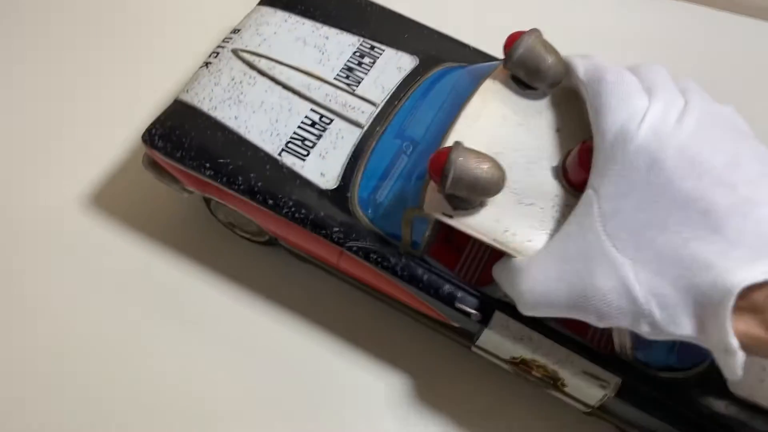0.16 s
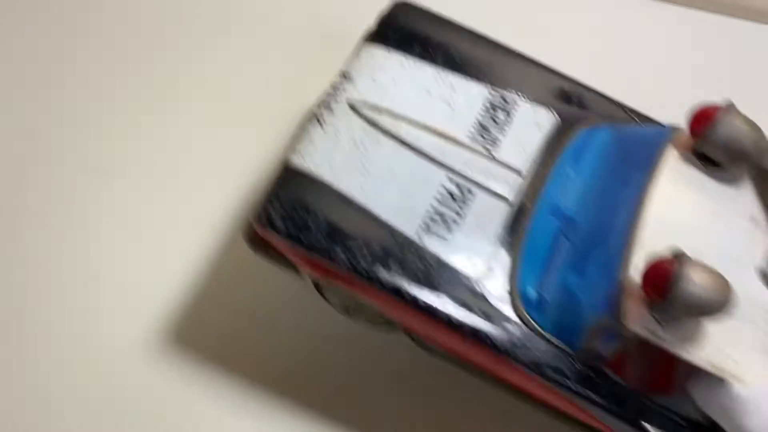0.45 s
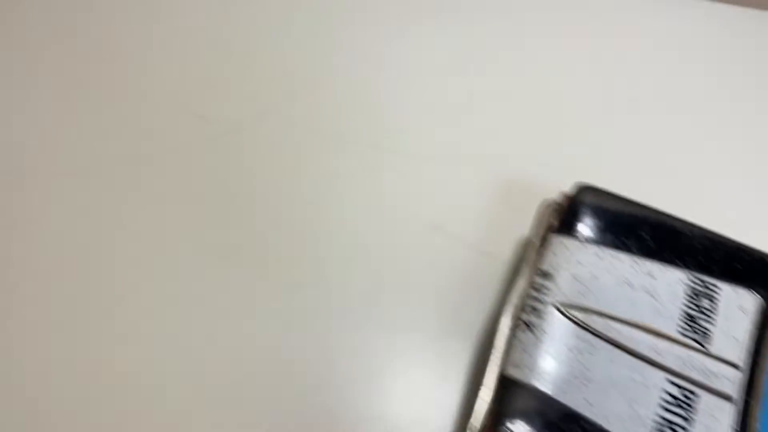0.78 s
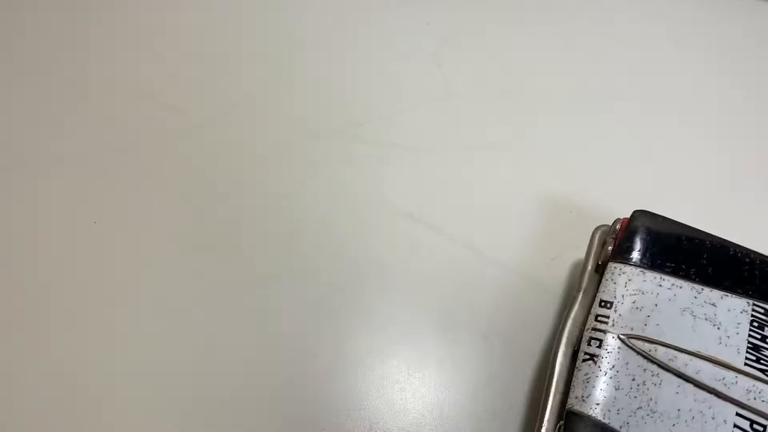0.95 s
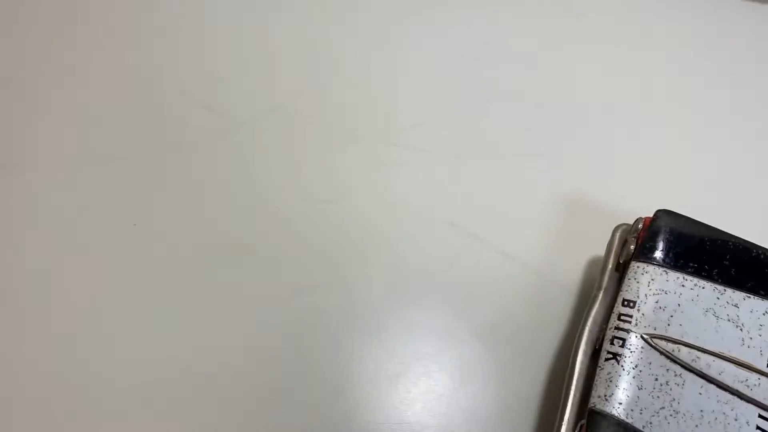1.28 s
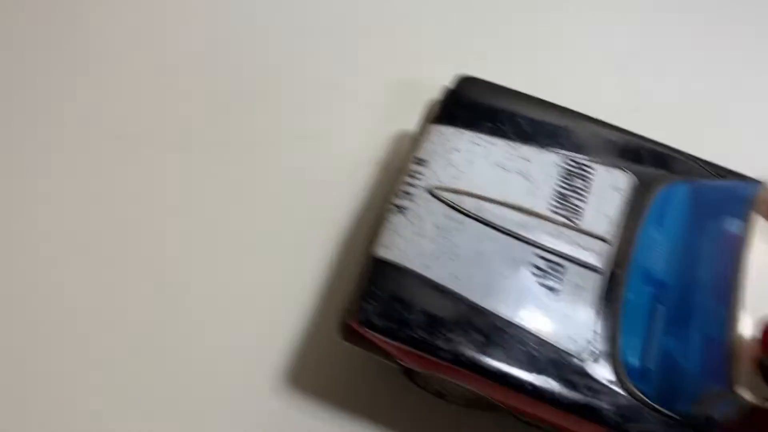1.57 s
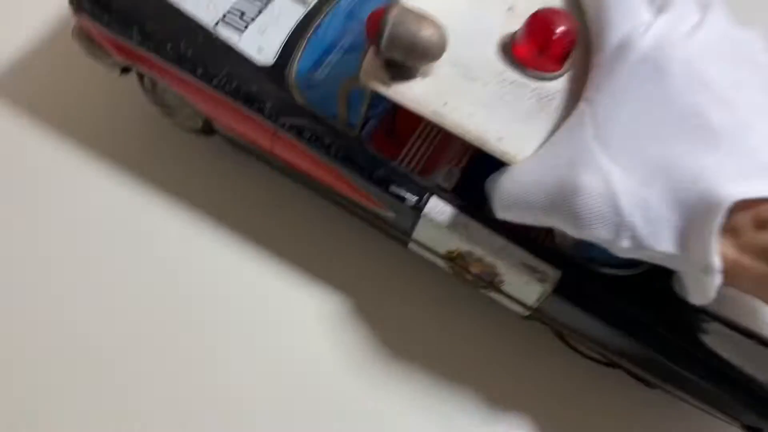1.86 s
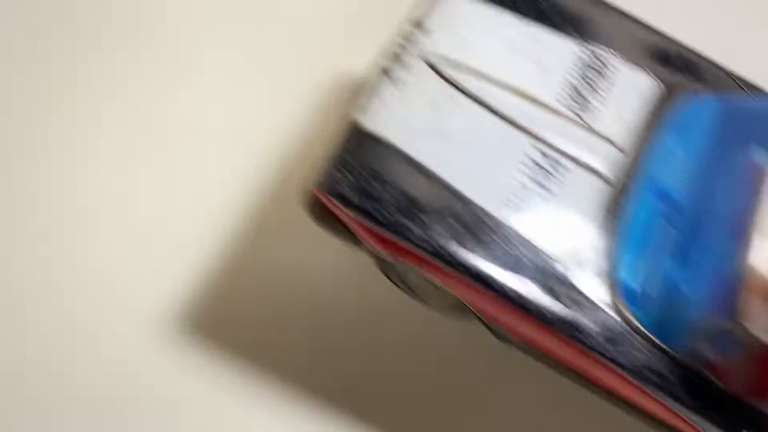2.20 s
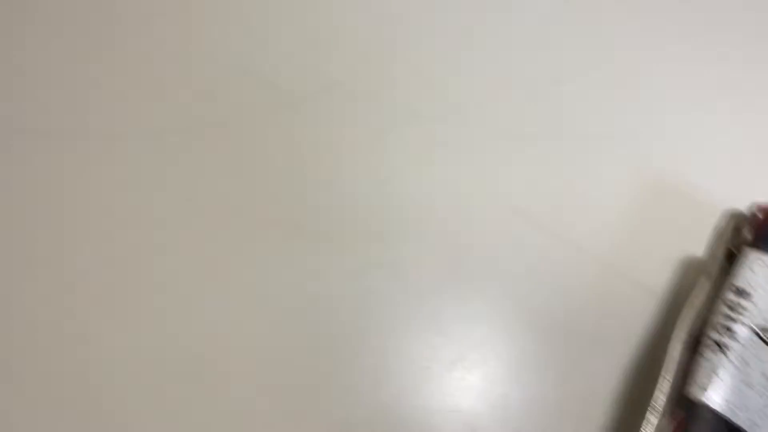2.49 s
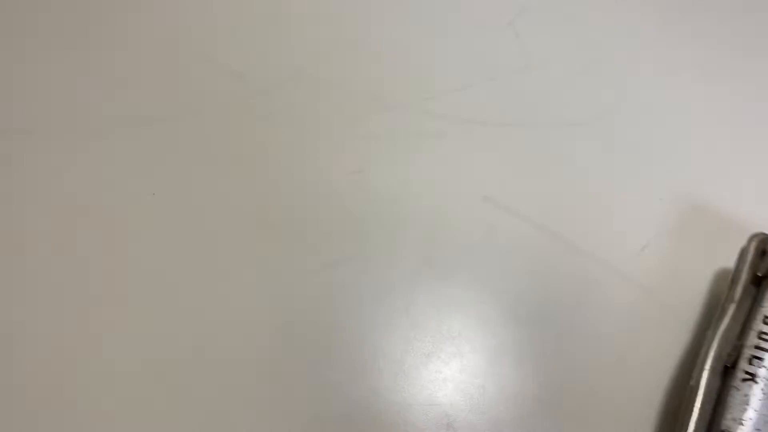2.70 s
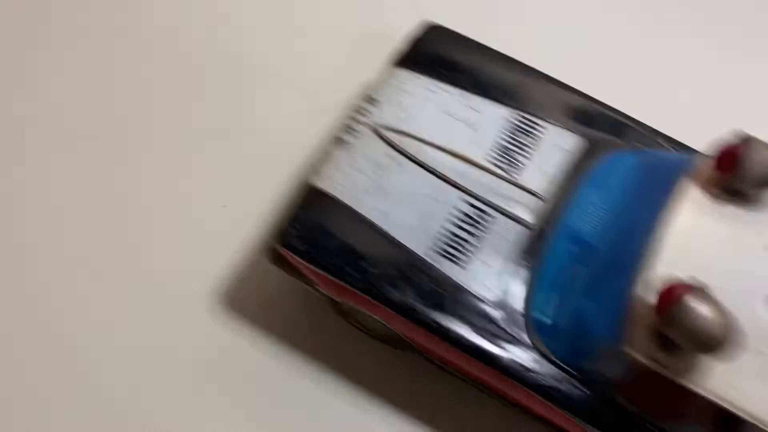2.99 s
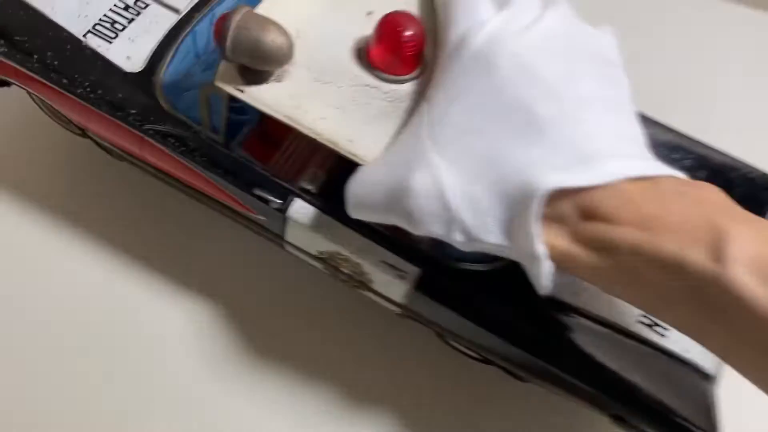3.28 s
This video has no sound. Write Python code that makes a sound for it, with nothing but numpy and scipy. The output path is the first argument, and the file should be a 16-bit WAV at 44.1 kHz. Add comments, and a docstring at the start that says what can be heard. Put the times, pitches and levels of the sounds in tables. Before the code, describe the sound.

A friction-drive tin toy car coasts with a faint sinking whine, thumps onto a table, then is pushed twice with rough grinding whirrs and rattling between, heard very close in stereo.

```python
"""Tyres rumble, gears rattle and whine, and tin knocks as a toy car is pushed, lifted and set down, twice.
Wheels, gear teeth and knocks are dense random impacts, filtered by the resonances of a tin shell.
A flywheel coasting in the air is a set of sinking gear tones; a hard push adds a rough grind.
Knocks and short gear rattles sum a thump, clank, jangle and click with panel tones; snaps are noise bursts.
Two close microphone ports of a camera hear it, with a likeness and balance that vary with frequency."""
import sys
import numpy as np
from scipy import signal
from scipy.fft import rfft, irfft, next_fast_len
from scipy.io import wavfile
from scipy.ndimage import map_coordinates

SR = 44100
rng = np.random.default_rng(int(sys.argv[2]) if len(sys.argv) > 2 else 0)


def master(y):
    """Save y as 16-bit WAV."""
    cut = np.clip(np.atleast_2d(y).T, -1, 1)
    pcm = np.round(cut * 32767)  # scale
    wavfile.write(sys.argv[1], SR, pcm.astype(np.int16))


N = 152145

# level of the wheels on the table: time_s, level_db
WHEEL_LEVELS = [(0, -34.5), (.12, -41.5), (.22, -39.5), (.36, -58), (.77, -55), (.84, -54), (.89, -29.5),
                (.94, -34), (1.04, -35), (1.13, -46), (1.19, -37), (1.35, -37.5), (1.42, -34.5),
                (1.47, -28), (1.55, -25.5), (1.65, -21.5), (1.82, -26.5), (1.89, -41.5), (2.0, -52.5),
                (2.54, -77), (2.59, -23.5), (2.69, -28.5), (2.79, -32.5), (2.85, -28), (2.92, -23.5),
                (3.11, -20), (3.205, -26), (3.25, -45), (3.45, -53)]

BUMPS_PER_S, TEETH_PER_S = 1500, 5000  # mean impact rates
TOOTH_SCATTER_DB = 2


def amp(db):
    """Decibel law: 20 dB is a factor of ten in amplitude."""
    return 10 ** (np.asarray(db) / 20)


def unit(x):
    """Power normalisation: scale to a root mean square of 1."""
    return x / np.sqrt(np.mean(x ** 2) + 1e-20)


def along(points, hz):
    """Interpolation of (frequency, value) points on a logarithmic frequency axis."""
    f, v = np.transpose(points)
    return np.interp(np.log(hz + 1), np.log(f + 1), v)


def curves(rows):
    """Linear interpolation in time: one value per sample for each column after the time."""
    s, *cols = np.transpose(rows)
    return [np.interp(np.arange(N) / SR, s, c) for c in cols]


def wobble(rate):
    """Slow random modulation: a smooth curve through normal random knots, rate of them a second."""
    knots = rng.standard_normal(int(N * rate / SR) + 4)
    return map_coordinates(knots, [np.arange(N) * rate / SR])


def filtered(x, response):
    """Linear filtering: the spectrum of x times a complex response of frequency."""
    m = 2 * next_fast_len(N // 2 + SR // 4)
    hz = np.fft.rfftfreq(m, 1 / SR)
    return irfft(rfft(x, m) * response(hz), m)[..., :N]


def shell(x, colour):
    """Resonant body: a minimum-phase filter of unit power, a broad colour with the shell's modes on it."""
    # modes of the tin shell on the table: centre_hz, width_hz, lift_db
    modes = [(59.5, 4, 6), (105.2, 14.7, 9), (173, 9.6, 4), (229.6, 14, 5), (313, 53, 7), (381, 27, 6),
             (416, 42, 8.5), (503.5, 57, 9.5), (648, 193, 10), (814, 136, 4.5), (901, 120, 4),
             (1070, 39, 6.5), (1257, 153, 5.5), (1603, 440, 4), (2016, 56, 3), (2520, 89, 4),
             (4220, 690, 3), (5740, 300, 1.5), (7140, 390, 2.5), (7500, 530, 1.5), (11100, 370, 5.5)]

    def response(hz):
        lift_db = sum(db / (1 + (2 * (hz - c) / w) ** 2) for c, w, db in modes)
        gain = unit(amp(along(colour, hz) + lift_db))
        # folding the cepstrum onto positive times makes the filter causal
        cepstrum = irfft(np.log(gain + 1e-6))
        half = len(cepstrum) // 2
        return np.exp(rfft(np.r_[cepstrum[0], 2 * cepstrum[1:half]], len(cepstrum)))
    return filtered(x, response)


def impacts(rate, scatter_db):
    """Shot noise: dense irregular taps that ring the sheet metal, in two unrelated rows of rms 1."""
    ring_t60_s, ring_db, drift_rad = 0.042, 2.5, 1.46
    struck = rng.random((2, N)) < rate / SR
    signs = rng.choice([-1, 1], (2, N))
    strengths = amp(scatter_db * np.clip(rng.standard_normal((2, N)), -2, 2))
    taps = struck * signs * strengths

    def treble(hz):
        return hz / (hz + 700)

    t = np.arange(SR // 10) / SR
    tails = rng.standard_normal((2, 2, len(t))) * amp(-60 * t / ring_t60_s)
    rung = signal.fftconvolve(taps[None], tails, axes=2)[..., :N]
    ring_a, ring_b = filtered(unit(rung), treble)
    # the blend of two rings drifts as the car moves
    blend = drift_rad * wobble(5.005)
    ring = amp(ring_db) * (np.cos(blend) * ring_a + np.sin(blend) * ring_b)
    # offset the ring's added treble, so that the spectrum stays level
    return unit(filtered(unit(taps) + ring, lambda hz: 1 / np.hypot(1, amp(ring_db) * treble(hz))))


def wheels():
    """Rolling noise: tyres bump over the table and shake the shell while the car is pressed down."""
    # spectrum of the rumble: freq_hz, relative_db_per_hz
    rumble_colour = [(20, -38), (45, 3.5), (130, 0), (300, -2.5), (500, -4.5), (900, -4), (1500, -7.5),
                     (1950, -9.5), (2700, -21), (5000, -26), (16000, -34.5)]
    scatter_db, flutter_db = 1.5, 1.05
    level_db, = curves(WHEEL_LEVELS)
    bumps = impacts(BUMPS_PER_S, scatter_db)
    return shell(bumps * amp(level_db + flutter_db * wobble(70)), rumble_colour)


def gears():
    """Gear rattle: loose teeth strike in a dense stream, with buzz, rattle and treble levels of their own."""
    # gear train: time_s, buzz_level_db, rattle_level_db, fizz_level_db
    gear_levels = [(0, -43.5, -46, -42.5), (.2, -42.5, -43, -44.5), (.42, -44, -51, -49),
                   (.6, -40.5, -48, -51), (.78, -35.5, -48, -46), (.92, -37.5, -51.5, -47),
                   (1.03, -47.5, -60, -65), (1.13, -53, -60, -58), (1.35, -62, -64, -59),
                   (1.5, -55, -44, -47), (1.66, -26.5, -34, -32), (1.82, -22, -29, -27),
                   (1.93, -33.5, -28.5, -29), (2.08, -32.5, -31.5, -27.5), (2.3, -34.5, -36.5, -31),
                   (2.45, -31, -39, -29.5), (2.55, -32.5, -39, -31), (2.68, -37.5, -32, -37),
                   (2.84, -30, -35, -34), (3.0, -29, -29.5, -30), (3.13, -19.5, -26.5, -27.5),
                   (3.24, -26, -30, -28.5), (3.32, -30.5, -23, -25), (3.45, -33.5, -30, -23.5)]
    # buzz of the shell: freq_hz, relative_db_per_hz
    buzz_colour = [(30, -19), (130, -17), (235, -27.5), (370, -6.5), (550, -8.5), (720, -6), (1050, -2.5),
                   (1200, -8), (1400, -6.5), (1680, -2.5), (2200, -5), (3500, -12), (8000, -27.5)]
    # rattle of the teeth: freq_hz, relative_db_per_hz
    rattle_colour = [(300, -38), (1500, 1.5), (2100, 0.5), (3000, -2), (4500, 3.5), (6300, 3.5),
                     (7400, 2.5), (8200, 5), (9500, 1.5), (12000, -6), (16000, -44)]
    # top treble: freq_hz, relative_db_per_hz
    fizz_colour = [(2000, -55), (7000, -63), (9500, 7.5), (11000, -3), (13000, 2.5), (14200, 2.5),
                   (15500, 2.5)]
    flutter_db = 0.78 * wobble(200)  # shared by the three layers
    drifts_db = (1.3, .7, .6)
    colours = (buzz_colour, rattle_colour, fizz_colour)
    out = np.zeros((2, N))
    for level_db, drift_db, colour in zip(curves(gear_levels), drifts_db, colours):
        strikes = impacts(TEETH_PER_S, TOOTH_SCATTER_DB)
        out += shell(strikes * amp(level_db + flutter_db + drift_db * wobble(27.73)), colour)
    return out


def grind():
    """Stick-slip: loaded gears catch and slip under a push, in a grind that grows faster than the rumble."""
    # spectrum of the grind: freq_hz, relative_db_per_hz
    grind_colour = [(600, -20.5), (1100, -1.5), (1400, 0.5), (1700, 5), (2300, -4), (3200, -6.5),
                    (5000, -21), (12000, -32)]
    full_push_grind_db, full_push_wheels_db = -30, -21
    growth = 1.1  # dB of grind per dB of wheel level
    catches_per_s, catch_depth_db = 320, 6
    level_db, = curves(WHEEL_LEVELS)
    strikes = impacts(BUMPS_PER_S, TOOTH_SCATTER_DB)
    teeth = unit(strikes * amp(catch_depth_db * wobble(catches_per_s)))
    grind_db = full_push_grind_db + growth * (level_db - full_push_wheels_db)
    return shell(teeth * amp(grind_db), grind_colour)


def whine():
    """Gear meshing: tones sink as the flywheel slows, and swell on passing a panel's resonance."""
    # coasts in the air: start_s, end_s, mesh_pitch_hz, sag_hz_per_s, level_db, fade_db_per_s, hard_push (0 or 1)
    coasts = [(0.0, .76, 1473, 138, -48.5, 4, 0), (1.85, 2.57, 1360, 122, -39, 4, 1),
              (3.22, 3.5, 1415, 122, -40, 4, 1)]
    # gear tones: multiple_of_mesh_pitch, waver_share, gentle_coast_db, hard_coast_db
    tones = [(.498, 0.005, -20, -3), (1, 0.0028, 2.5, 0.5), (.985, .008, 0, -18), (3.14, 0.015, -3, -3.5),
             (3.93, .006, -20, -3), (4.16, 0.009, -14, 3), (4.43, .005, -20, -1.5), (4.84, .022, -4, -8),
             (5.17, 0.006, -12, 1.5), (5.65, 0.011, -15, 0)]
    panel_hz, panel_width_hz, panel_lift_db = 642, 13, 13  # the lowest tone can sink through it
    treble_fade_db_per_s, flutter_db = 17, 3
    t = np.arange(N) / SR
    out = np.zeros((2, N))
    for start, end, hz, sag, db, fade, hard in coasts:
        age = np.clip(t - start, 0, end - start)
        ramps = np.clip(np.minimum(t - start, end - t) / 0.045, 0, 1)
        level = amp(db - fade * age) * ramps
        pitch = hz - sag * age
        for multiple, waver, *tone_db in tones:
            tone_hz = multiple * pitch
            phase = 2 * np.pi * np.cumsum(tone_hz * (1 + waver * wobble(300))) / SR
            hum_db = panel_lift_db / (1 + (2 * (tone_hz - panel_hz) / panel_width_hz) ** 2)
            # after a hard push the high tones fade early
            loss_db = treble_fade_db_per_s * age * hard * (multiple > 2)
            gain = amp(tone_db[hard] + hum_db - loss_db + flutter_db * wobble(110))
            out += level * gain * np.array([np.sin(phase), np.cos(phase)])
    return out


def knocks():
    """Impact excitation: table contacts thump, short gear rattles in the air barely do; all die away."""
    # knocks and brief gear-train rattle swells: start_s, thump_db, clank_db, jangle_db, click_db, length_s
    knock_events = [(0.16, -42, -30, -28, -39, 0.0088), (0.186, -60, -36, -36, -42, .006),
                    (0.796, -17.5, -19.5, -23, -27, 0.0087), (0.814, -28, -24.5, -30, -49, 0.021),
                    (0.902, -30, -25.5, -26.5, -46, 0.0021), (1.154, -34, -26.5, -34.5, -61, 0.0035),
                    (1.226, -43, -29, -29.5, -44, 0.0023), (1.262, -34, -27, -28, -32.5, 0.008),
                    (1.433, -34.5, -32, -34, -57, 0.0028), (2.119, -68, -31, -44, -51, 0.0084),
                    (2.198, -62, -30, -38, -46, 0.0076), (2.285, -65, -44, -32, -42, 0.0071),
                    (2.432, -65, -32.5, -38, -33, 0.0086), (2.566, -17, -25.5, -18, -18.5, 0.0075),
                    (2.66, -27, -31.5, -54, -58, 0.027), (2.809, -38, -21, -30, -28.5, 0.0041),
                    (2.876, -52, -27.5, -45, -44, 0.0036), (3.119, -22, -27.5, -24, -30, 0.0055)]
    # ring of the tin panels: freq_hz, level_over_jangle_db, t60_s
    panels = [(903, -8, 0.1), (1083, -9, 0.14), (1536, -10, 0.05), (1620, -6, 0.045), (2480, -16, 0.12),
              (6300, -18, 0.11)]
    # spectra of the four layers: freq_hz, relative_db_per_hz
    thump_colour = [(30, -36), (62, -15), (95, -3), (160, 0), (245, 2), (380, -8), (800, -22), (3000, -50)]
    clank_colour = [(200, -8), (450, 1.5), (680, 4), (1000, -2.5), (1700, -4), (2600, -6.5), (5000, -16),
                    (15000, -29)]
    jangle_colour = [(400, -20), (800, -3), (1130, 3), (1320, -2), (1560, 2), (1950, -8), (2480, -6),
                     (3100, -14), (6000, -24), (15000, -40)]
    click_colour = [(300, -38), (1500, 5), (3000, 6.5), (6000, 2), (9000, 1), (12000, 1), (16000, -9)]
    attack_s, tin_low_hz = 0.0025, 230
    push_db = 22.5  # a single pulse, over the thump level
    t = np.arange(N) / SR
    age = t[:SR // 4]
    out, pushes = np.zeros((2, N)), np.zeros(N)
    for s, thump_db, _, jangle_db, _, length in knock_events:
        at = round(s * SR)
        pushes[at] = amp(thump_db + push_db)
        ring = np.zeros(len(age))
        for hz, db, t60 in panels:
            decay = amp(jangle_db + db + rng.normal(0, 1.1) - 60 * age / t60)
            ring += decay * np.sin(2 * np.pi * hz * age)
        out[:, at:at + len(age)] += np.outer([1, .5], ring)
    # colour, t60 in s, push (only the thump has one)
    layers = [(thump_colour, 0.074, np.outer([1, 0], pushes)), (clank_colour, 0.15, 0),
              (jangle_colour, 0.12, 0), (click_colour, 0.12, 0)]
    thin = signal.butter(3, tin_low_hz, "high", fs=SR, output="sos")
    for k, (colour, t60, push) in enumerate(layers):
        level = np.zeros(N)
        for s, *layer_db, length in knock_events:
            attack = np.clip((t - s) / attack_s, 0, 1)
            level += attack * amp(layer_db[k] - 60 * np.clip((t - s - length) / t60, 0, 2))
        layer = shell(push + level * impacts(TEETH_PER_S, TOOTH_SCATTER_DB), colour)
        # all layers but the thump lose their bass
        out += signal.sosfilt(thin, layer) if k else layer
    return out


def snaps():
    """Broadband transients: brief bursts of noise, very bright, where loose tin parts meet."""
    # sharp snaps of tin on tin: start_s, level_db
    snap_events = [(1.221, -30), (1.26, -19), (2.567, -11)]
    # spectrum of a snap: freq_hz, relative_db_per_hz
    snap_colour = [(500, -5), (2500, 9), (8000, -13), (12000, -9), (15500, 11.5)]
    t60_s = 0.04
    t = np.arange(N) / SR
    level = sum((t >= s) * amp(db - 60 * np.clip((t - s) / t60_s, 0, 2)) for s, db in snap_events)
    return shell(level * rng.standard_normal((2, N)), snap_colour)


def scene():
    """Interchannel coherence: mid and side shares set how alike two close microphone ports hear the car."""
    # likeness of left and right: freq_hz, correlation
    likeness = [(60, 1), (150, 0.82), (500, 0.7), (1000, 0.72), (1500, 0.085), (1900, -0.41), (2400, 0.63),
                (4500, 0.51), (5600, 0.32), (6200, 0.59)]
    # balance of the ports: freq_hz, left_minus_right_db
    balance = [(60, 1.7), (300, -1), (600, 0.2), (1050, -1.1), (1550, 5), (2400, 0.7), (4300, 1.5),
               (6200, 0.4), (15000, -0.8)]
    mono_above_hz = 6300

    def spread(hz):
        angle = np.arccos(np.clip(along(likeness, hz), -1, 1)) / 2 * (hz < mono_above_hz)
        return np.array([np.cos(angle), np.sin(angle)])

    car = wheels() + gears() + grind() + whine() + knocks() + snaps()
    mid, side = filtered(car, spread)
    ports = np.array([mid + side, mid - side])
    return filtered(ports, lambda hz: amp(np.outer([.5, -.5], along(balance, hz))))


def record(dry):
    """Band limiting and phase shift: the camera cuts deep bass and top, and widens the treble by phase."""
    # phase between the channels: freq_hz, right_lead_half_turns
    phase_lead = [(8000, 0), (8950, 1), (9500, 1), (10500, 2), (11650, 2), (13000, 3), (13700, 3),
                  (14800, 4)]
    low_cut_hz, top_hz = 40, 15780
    dry = signal.sosfilt(signal.butter(4, low_cut_hz, "high", fs=SR, output="sos"), dry)

    def response(hz):
        half_turns = np.interp(hz, *np.transpose(phase_lead))
        return np.exp(1j * np.pi * np.outer([-.5, .5], half_turns)) * (hz < top_hz)
    return filtered(dry, response)


dry = scene()
out = record(dry)
master(out)
```